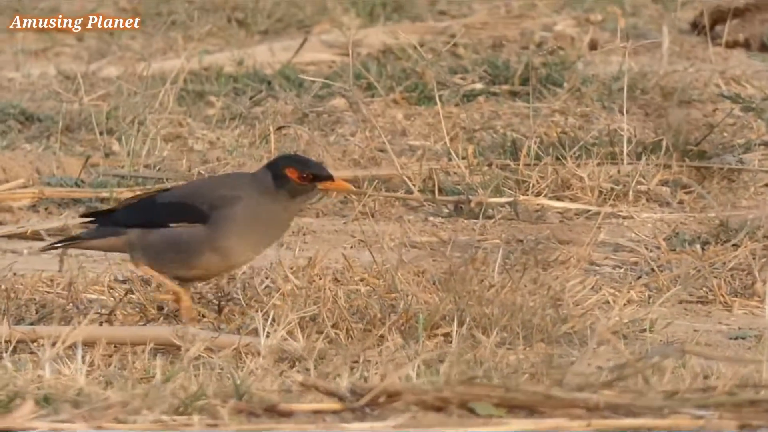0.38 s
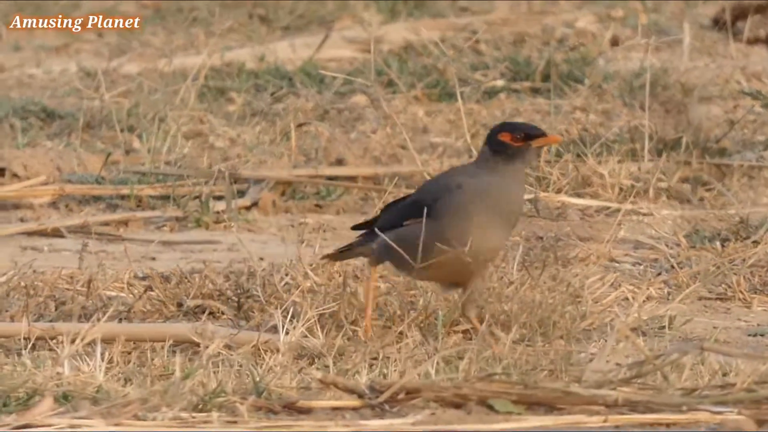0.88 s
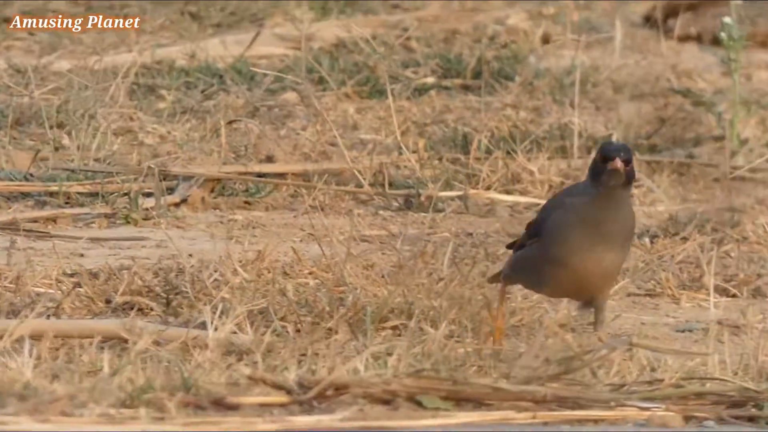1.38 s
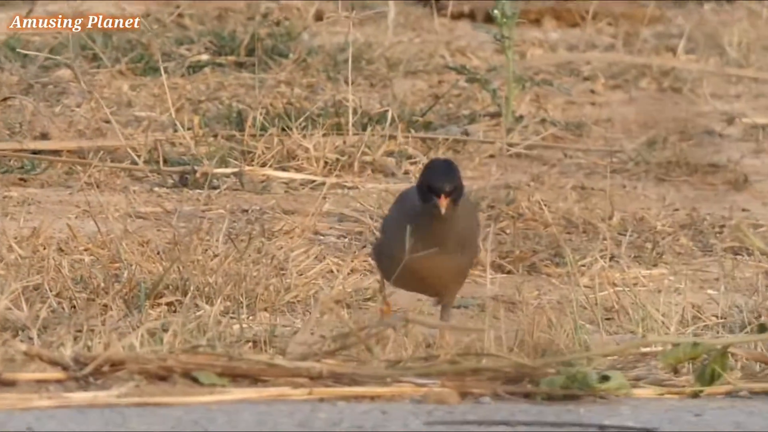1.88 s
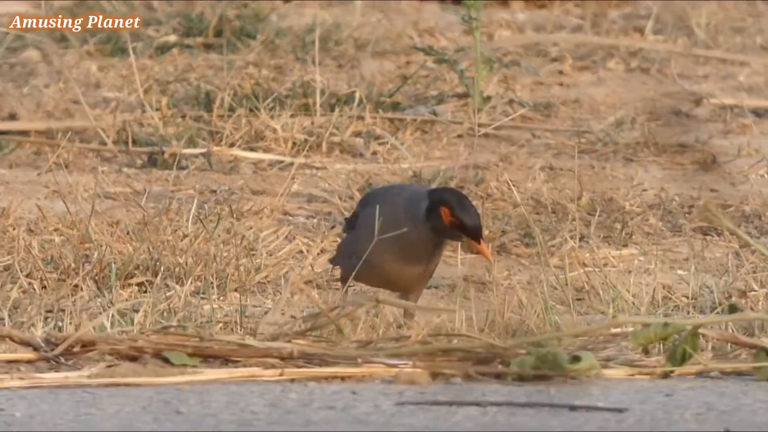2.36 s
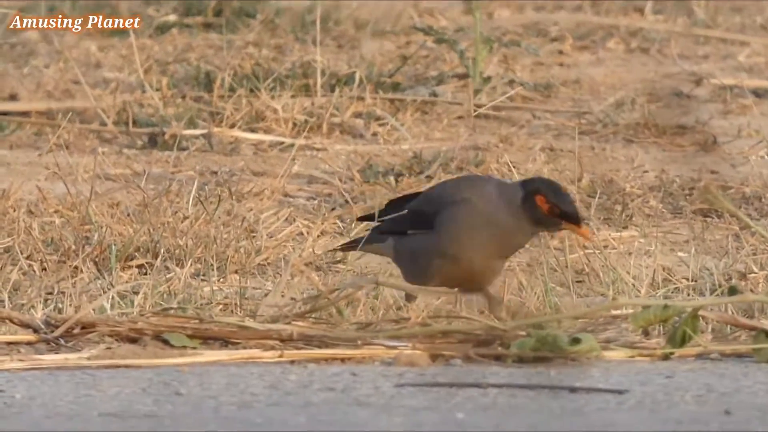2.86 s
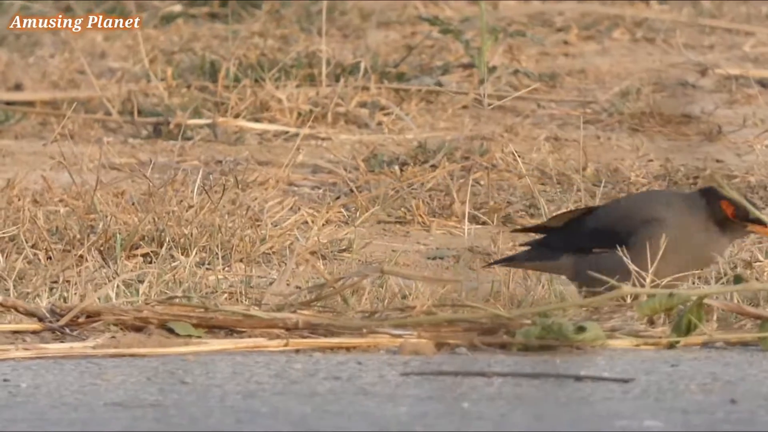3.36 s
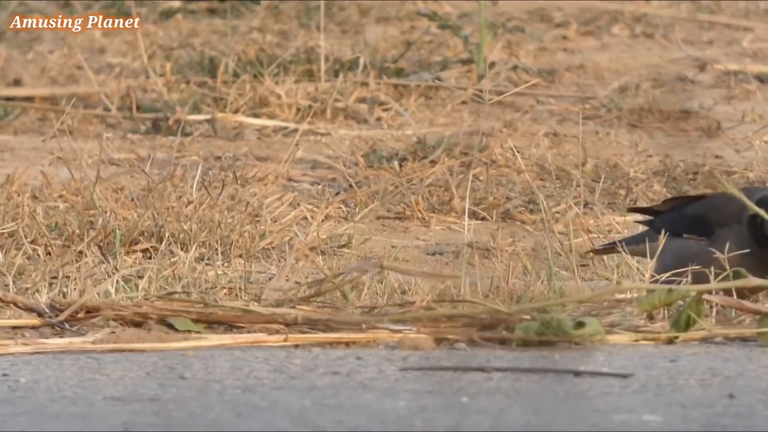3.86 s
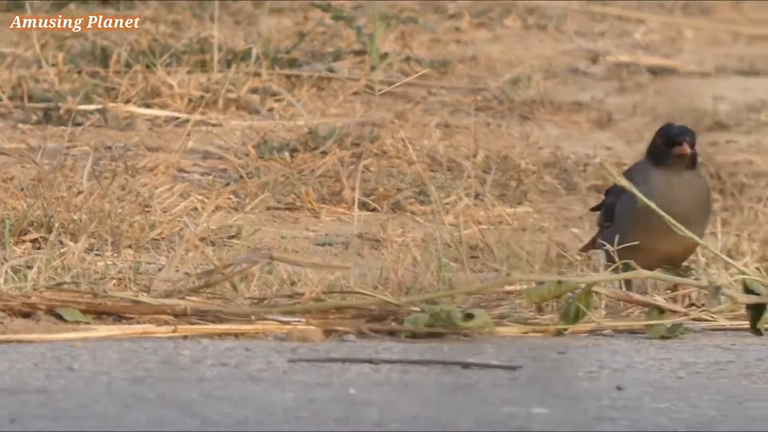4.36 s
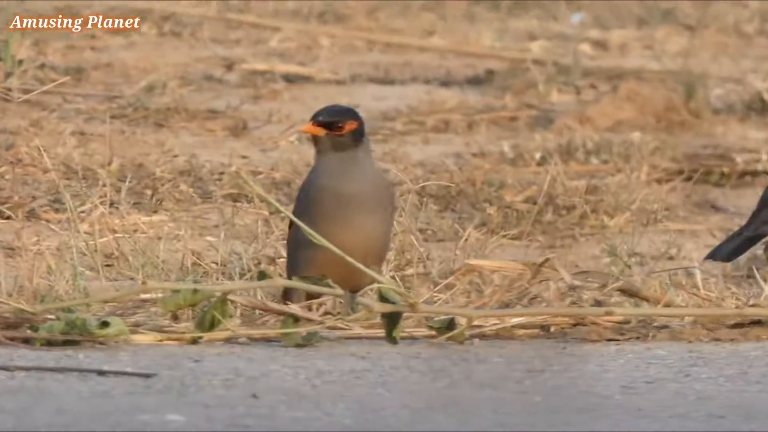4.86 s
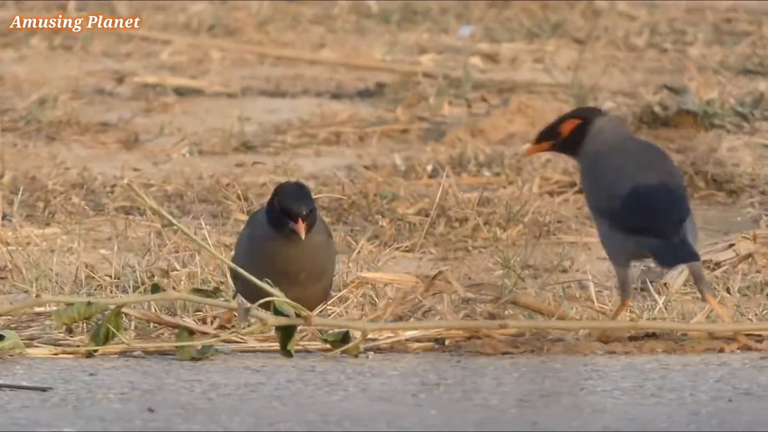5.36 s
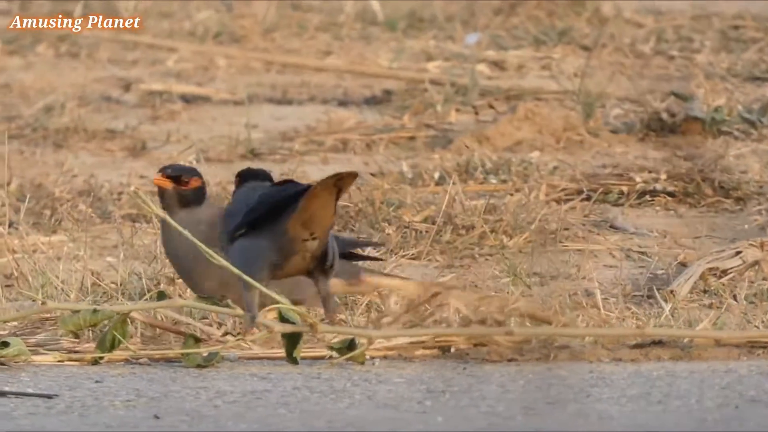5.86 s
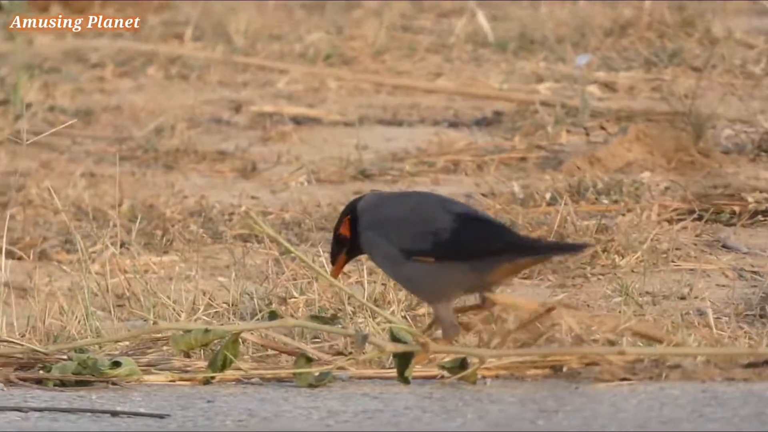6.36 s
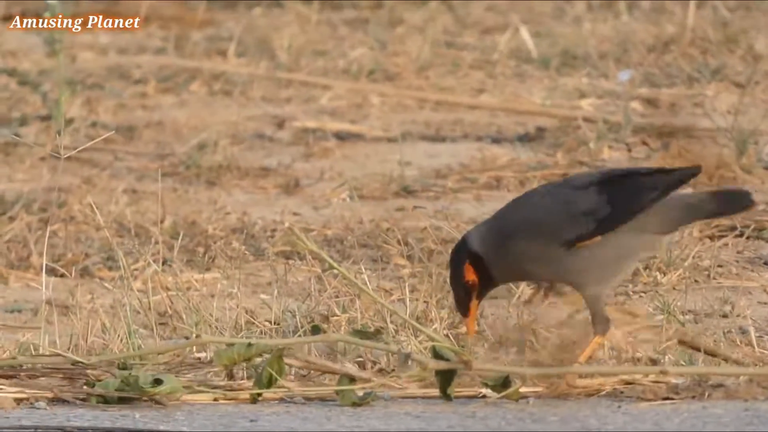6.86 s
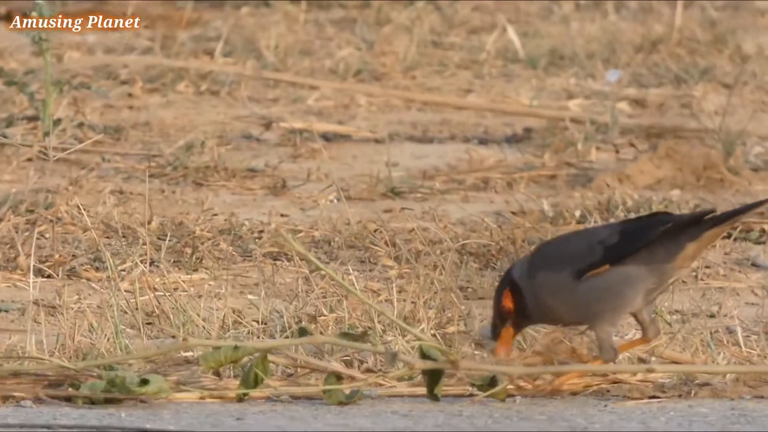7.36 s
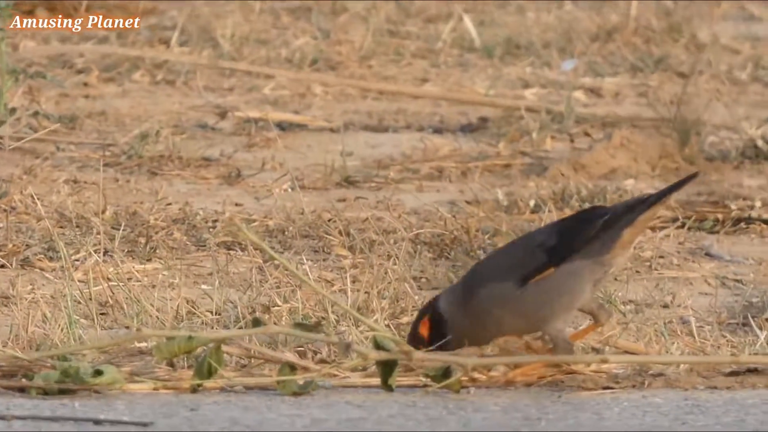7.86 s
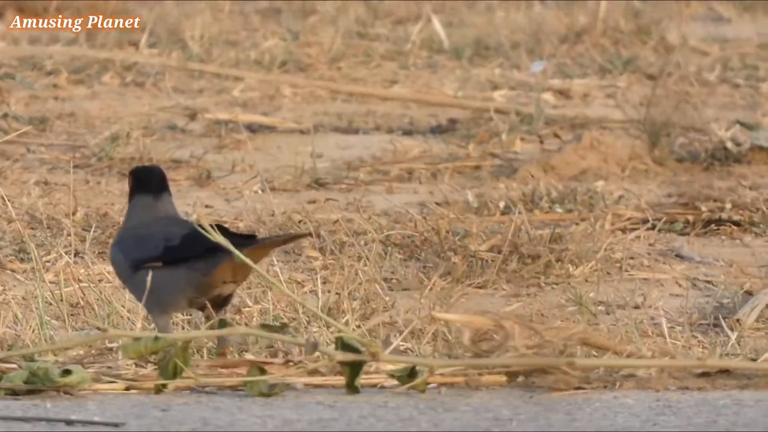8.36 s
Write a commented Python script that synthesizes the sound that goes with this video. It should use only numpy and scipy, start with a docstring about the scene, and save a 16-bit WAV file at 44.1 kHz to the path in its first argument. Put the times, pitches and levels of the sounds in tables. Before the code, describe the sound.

Stereo outdoor ambience in dry grass beside a road. Throughout, a steady, thin insect drone sits around 5 kHz over soft low traffic rumble and a faint engine hum. At 0-0.6 s come the end of a chipping phrase, a whistle and a sharp pip, with faint crickets. At 0.6-1.0 s a fast scratchy twitter swoops and flicks near the centre, then a faint distant bird answers. A rough descending buzz comes at 1.9-2.1 s. At 2.5-3.3 s a thin high seep and a row of chips on the left join a clear whistle, a loud pip and a soft slur. Crickets pulse strongly at 3.4-4.9 s. Falling whistles sound at 5.1-5.5 s, then a doubled beating one at 5.9 s. The twitter returns at 5.0-5.4 s, the buzz at 6.3 s, seep and chips from 7.7 s, with whistle and pip near 8.1 s. Crickets swell until the end at 8.7 s.

```python
"""In dry grass beside a road several birds sing: a twitter and a buzz, a row of chips with a whistle and
a pip, a high seep, falling calls. The twitter, chip and seep phrases return exactly; the calls come once.
Two-sided syrinx tones and near sines make the birds, pulsed falling tones the crickets' trills. Shaped noise
makes the insect drone, the distant traffic and the air; narrow resonances make the hum of far engines."""
import sys
import numpy as np
from scipy import signal
from scipy.fft import rfft, irfft
from scipy.io import wavfile
from scipy.ndimage import uniform_filter1d

SR = 44100
rng = np.random.default_rng(int(sys.argv[2]) if len(sys.argv) > 2 else 0)


def how_loud(loudness_db):
    """Turn decibels into a plain amplitude multiplier (0 dB gives 1, 20 dB gives 10)."""
    steps = np.asarray(loudness_db, float) / 20
    return 10 ** steps


def generate_wav(sig):
    """Save sig (samples, or channels by samples) to the path in sys.argv[1] as 16-bit PCM at SR."""
    pcm = np.round(np.clip(np.atleast_2d(sig).T, -1, 1) * 32767).astype(np.int16)
    wavfile.write(sys.argv[1], SR, pcm)


N = 384993


def read(points, hz):
    """Spectral envelope: dB or likeness interpolated straight on a log-frequency axis."""
    f, value = np.transpose(points)
    return np.interp(np.log(hz + 1), np.log(f + 1), value)


def evened(x):
    """Power normalisation: scales to rms 1."""
    return x / np.sqrt(np.mean(x ** 2) + 1e-20)


def wander(length, size):
    """Low-passed random fluctuation: noise averaged twice over size samples, rms 1."""
    smooth = uniform_filter1d(rng.standard_normal(length), size)
    return evened(uniform_filter1d(smooth, size))


def turns(hz):
    """Phase in radians is the running integral of frequency."""
    return 2 * np.pi * np.cumsum(hz) / SR


def span(length):
    """Time sampling of a note's shape in 160 points, a millisecond or less apart."""
    return np.linspace(0, length, num=160)


def table(start, t, *values):
    """Contour sampling: rows (s, values) from shapes over the time t since the start."""
    return np.column_stack(np.broadcast_arrays(start + t, *values))


def columns(rows):
    """Interpolates contours to the sample rate; the last, in dB, becomes a gain with soft ends."""
    s, *values = np.transpose(rows)
    t = np.arange(s[0], s[-1], 1 / SR)
    to_edge = np.minimum(t - s[0], s[-1] - t)
    fade = np.sin(np.pi / 2 * np.clip(to_edge / .004, 0, 1)) ** 2  # over 4 ms
    values[-1] = how_loud(values[-1])
    *pitches, gain = (uniform_filter1d(np.interp(t, s, v), size=61) for v in values)
    return *pitches, gain * fade


def add(mix, s, sound, pan_db):
    """Level-difference panning (left minus right); the mean of left and right keeps its level."""
    left = 1 / (1 + how_loud(-pan_db))
    part = mix[:, round(s * SR):][:, :len(sound)]
    part += 2 * np.outer([left, 1 - left], sound[:part.shape[1]])


def sing(voice, notes, pan_db):
    """Source and contour: a voice sounds each note's rows, giving (s, sound, pan dB)."""
    return [(rows[0][0], voice(rows), pan_db) for rows in notes]


def phrase(notes, again):
    """Superposition: lays (s, sound, pan dB) notes once, then copies that phrase exactly to each shift."""
    once, out = np.zeros((2, N)), np.zeros((2, N))
    for s, sound, pan_db in notes:
        add(once, s, sound, pan_db)
    for later in again:
        shift = round(later * SR)
        out[:, max(shift, 0):N + min(shift, 0)] += once[:, max(-shift, 0):N - max(shift, 0)]
    return out


def noise(spectrum, size, patchy_db, swell_db):
    """Filtered noise: random short-time spectra with drifting patches, a shared flicker and stereo coherence."""
    # left-right likeness: f/Hz, coherence
    likeness = [(60, 0.92), (120, 0.94), (240, 0.87), (480, 0.38), (950, 0.35), (1890, 0.77), (3770, 0.91),
                (7520, 0.6), (15000, 0.18)]
    # stereo balance: f/Hz, left minus right level/dB
    balance = [(60, -0.5), (150, 1), (380, 0.5), (950, 2.5), (2380, 3), (5980, 0), (15000, -1)]
    frames, hz = 4 * N // size + 5, np.fft.rfftfreq(size, 1 / SR)
    a, b, c, d, patches = rng.standard_normal((frames, len(hz), 5)).T
    patches = evened(uniform_filter1d(uniform_filter1d(patches, 8, axis=0), 8, axis=1))
    same = np.clip(read(likeness, hz), -1, 1)[:, None]
    left, other = a + 1j * b, c + 1j * d
    z = np.array([left, same * left + np.sqrt(1 - same ** 2) * other])
    z *= how_loud(read(spectrum, hz)[:, None] + patchy_db * patches + swell_db * wander(frames, size=3))
    z *= how_loud(np.outer([.5, -.5], read(balance, hz)))[:, :, None]
    return evened(signal.istft(z, nperseg=size, noverlap=3 * size // 4)[1][:, :N])


def insect_drone():
    """Many incoherent insects sum to noise with the spectrum of their massed songs."""
    # spectral shape of the massed insects: f/Hz, relative level/dB
    massed = [(2350, -33.5), (4000, -26), (4350, -27), (4610, -4), (5020, 1), (5460, 0.5), (5650, -2),
              (6220, -9.5), (7290, -12.5), (8540, -19.5), (9240, -13), (10200, -13.5), (11900, -20),
              (14500, -25), (15500, -28)]
    # slow course of the drone: t/s, rms level/dB
    course = [(0, -59), (1.2, -58), (2.5, -60), (3.7, -61), (5.0, -57.5), (5.6, -58.5), (6.801, -59.5),
              (8.73, -60)]
    gain = how_loud(np.interp(np.arange(N) / SR, *np.transpose(course)))
    return gain * noise(massed, size=256, patchy_db=1.0, swell_db=0.07)


def traffic_and_air():
    """Broadband noise weighted to low frequencies, at rms -60.5 dB."""
    # spectral shape of distant traffic and air: f/Hz, relative level/dB
    rumble = [(15, -50), (25, -13.5), (64, -5.5), (130, 1.5), (301, -9.5), (349, -7.5), (433, -10.5),
              (584, -7.5), (806, -13), (977, -10.5), (1260, -14), (1410, -15.5), (2790, -28.5),
              (3540, -51.5), (4200, -46), (5460, -57), (9240, -120)]
    return how_loud(-60.5) * noise(rumble, size=2048, patchy_db=1.67, swell_db=0.85)


def hum():
    """Resonance: noise in narrow bands gives the low wavering tones of far engines."""
    # resonances: f/Hz, width at half amplitude/Hz, rms level/dB
    engines = [(57, 9.9, -75), (119.5, 51, -73.5)]
    hz = np.fft.rfftfreq(N, 1 / SR)
    out = 0
    for f, width, db in engines:
        resonance = 1 / (1 + (2 * (hz - f) / width) ** 2)
        out = out + how_loud(db) * evened(irfft(rfft(rng.standard_normal(N)) * resonance, N))
    return out


def trill(start, end, swell, db, last_db):
    """Amplitude envelope: a swell that starts slowly, a slow drift of level, a faint tail."""
    swell_db, tail_db, tail_s = -15, -9, .12
    return [(start, db + swell_db), (start + .7 * swell, db + .7 * swell_db), (start + swell, db),
            (end, last_db), (end + .02, last_db + tail_db), (end + tail_s, last_db + tail_db)]


def crickets():
    """Stridulation: each wing stroke is a short tone that falls in pitch as the file slows."""
    # strokes: t/s of one mid stroke, strokes per s, f/Hz, fall per stroke period/Hz, pan/dB left minus right
    strokes = [(.0211, 42.9, 7120, 200, 4), (1.2525, 47.45, 6650, 250, 0), (2.6171, 41.35, 6750, 250, 0),
               (3.6131, 46.7, 6830, 420, 0), (4.3201, 45.7, 6830, 680, 0), (6.7132, 41.6, 6750, 250, 0),
               (7.323, 43.05, 7120, 200, 4), (8.2176, 46.85, 6780, 700, 0)]
    # envelopes: start t/s, end t/s, swell/s, level/dB after the swell, last level/dB
    envelopes = [(0, .43, .01, -73, -72.5), (1.2, 1.93, .1, -68, -67), (2.6, 3.35, .01, -75, -75),
                 (3.42, 4.31, .21, -62, -60.5), (4.31, 4.875, .01, -59.5, -59), (6.65, 7.7, .01, -71, -80),
                 (7.1, 8.15, .4, -72, -72), (8.1, 8.73, .15, -60.5, -58.5)]
    out = np.zeros((2, N))
    for (first, rate, hz, fall_hz, pan_db), row in zip(strokes, envelopes):
        rows = trill(*row)
        start = rows[0][0]
        gain, = columns(rows)
        t = start + np.arange(len(gain)) / SR
        place = ((t - first) * rate + .5) % 1 - .5  # in stroke periods, 0 at mid stroke
        stroke = np.exp(-(place / .21) ** 2) * how_loud(1.6 * wander(len(gain), size=300))
        pitch = hz - fall_hz * place + 30 * wander(len(gain), size=200)
        add(out, start, gain * evened(stroke * np.sin(turns(pitch))), pan_db)
    return out


def whistle(rows):
    """Pure-tone source: a near sine; the highest notes are second harmonics and carry a faint third."""
    hz, gain = columns(rows)
    third = how_loud(-24) * (hz.mean() > 8200) * np.sin(3 * turns(hz) / 2)
    return gain * np.sqrt(2) * (np.sin(turns(hz)) + third)


def chip(s, db, hz, dip_db):
    """Frequency modulation: the pitch arches under a round-shouldered level with a dip in the middle."""
    length_s, arch_hz, edge_db, dip_s = .027, 170, -18, .004
    t = span(length_s) - length_s / 2
    u = 2 * t / length_s
    return table(s, t, hz - arch_hz * u ** 2, db + edge_db * u ** 4 + dip_db * np.exp(-(t / dip_s) ** 2))


def long_whistle(start, end, db, hz):
    """Steady tone with an exponential swell, then a falling break."""
    swell_s, drop_hz_per_s, fade_db_per_s, tail_s = .03, 28000, 900, .013
    t = span(end - start + tail_s)
    after = np.maximum(t - (end - start), 0)
    return table(start, t, hz - drop_hz_per_s * after, db - 30 * np.exp(-t / swell_s) - fade_db_per_s * after)


def peep(start, length, db, from_hz, to_hz):
    """Bell envelope: a soft note swells and fades by 20 dB while the pitch eases to its goal."""
    t = span(length)
    pitch = from_hz + (to_hz - from_hz) * np.sin(np.pi / 2 * t / length)
    return table(start, t, pitch, db - 20 * (2 * t / length - 1) ** 2)


def pip(db, hz):
    """Tone burst: a few cycles under a bell, a faint lead-in, fainter repeats with turned sign."""
    width_s, gap_s = .0026, .0058
    t = np.arange(0, .05, 1 / SR) - .015  # the main bell peaks at 0
    levels_db = [-18, 0] + [-9 - 10 * np.sqrt(k) for k in range(4)]  # lead-in, main, repeats
    bells = 0
    for k, level in enumerate(levels_db):
        bells = bells + (-1) ** k * how_loud(level) * np.exp(-((t - (k - 1) * gap_s) / width_s) ** 2)
    return how_loud(db) * bells * np.sin(2 * np.pi * hz * t)


def chipping_bird():
    """Tonal whistling: chips, slide and closing slur hard left, long whistle and pip nearer the middle."""
    # chips: middle t/s, level/dB, top f/Hz, dip in the middle/dB
    chips = [(2.553, -52, 2790, -6), (2.639, -45.5, 2760, -6), (2.726, -44, 2740, -1.5),
             (2.812, -43, 2690, 0), (2.901, -44, 2640, 0), (2.988, -45.5, 2590, 0)]
    # soft slide among the chips: start t/s, length/s, level/dB, from f/Hz, to f/Hz
    slides = [(2.936, .03, -50, 2680, 2400)]
    # soft closing slur: t/s, f/Hz, level/dB
    slur = [(3.16, 2290, -70), (3.18, 2250, -64), (3.202, 2150, -57), (3.222, 2210, -62),
            (3.236, 2340, -69), (3.258, 2402, -58), (3.274, 2420, -56), (3.306, 2485, -66),
            (3.326, 2455, -63), (3.338, 2420, -72)]
    # long whistle: start t/s, break t/s, level/dB, f/Hz
    long_note = (2.843, 2.929, -35.5, 3260)
    # pip: peak t/s, peak level/dB, f/Hz
    pip_note = (3.0805, -27.5, 2495)
    # phrase repeats: shift t/s
    chip_shifts = [-2.7115, 0, 5.1809]
    notes = sing(whistle, [chip(*r) for r in chips] + [peep(*r) for r in slides] + [slur], pan_db=36)
    notes += sing(whistle, [long_whistle(*long_note)], pan_db=6)
    notes += [(pip_note[0] - .015, pip(*pip_note[1:]), 3.5)]
    return phrase(notes, chip_shifts)


def syrinx(low_hz, high_hz, gain, low_step_db, high_step_db, breath_db, jitter_hz):
    """Two membranes gate one air stream: harmonics, sums and differences, coloured by the tract, plus breath."""
    # windpipe and beak of the twittering bird: f/Hz, relative level/dB
    tract = [(2500, -35), (3400, -25.5), (4000, -14.5), (4800, -1), (6500, 4), (7600, -6.5), (8600, -26.5),
             (10500, -17), (12000, -31), (13500, -44)]
    low_hz = low_hz + jitter_hz * wander(len(gain), size=20)
    high_hz = high_hz + jitter_hz * wander(len(gain), size=20)
    sound, power = 0, 1e-12
    for i in range(-2, 5):
        for j in range(-2, 4):
            hz = i * low_hz + j * high_hz
            line_db = low_step_db * abs(i) + high_step_db * abs(j) + read(tract, np.maximum(hz, 1))
            line = how_loud(line_db) * (hz > 1500)
            sound = sound + line * np.cos(turns(hz))
            power = power + line ** 2 / 2
    bins_hz = np.fft.rfftfreq(len(gain), 1 / SR)
    colour = how_loud(0.71 * read(tract, bins_hz)) * (bins_hz > 2800)  # breath takes a flatter tract
    breath = irfft(rfft(rng.standard_normal(len(gain))) * colour, len(gain))
    return gain * (sound / np.sqrt(power) + how_loud(breath_db) * evened(breath))


def duet(rows):
    """Intermodulation of both membranes: a stack of lines spaced by the difference of the pitches."""
    return syrinx(*columns(rows), low_step_db=-3.5, high_step_db=-4.5, breath_db=-12, jitter_hz=17)


def solo(rows):
    """Harmonic series of one membrane alone."""
    hz, gain = columns(rows)
    return syrinx(hz, hz, gain, low_step_db=-2.5, high_step_db=-90, breath_db=-12, jitter_hz=25)


def warble(start, length, db, hz):
    """Frequency modulation: the pitch swings about a sinking centre, loudest near the middle."""
    sink_hz_per_s, swing_hz, period_s, top_s, loud_s = 15400, 390, .035, .0075, .031
    t = span(length)
    pitch = hz - sink_hz_per_s * t + swing_hz * np.cos(2 * np.pi * (t - top_s) / period_s)
    slope_db_per_s = np.where(t < loud_s, 380, 266)
    return table(start, t, pitch, db - slope_db_per_s * abs(t - loud_s))


def glide(start, length, db, from_hz, to_hz):
    """Linear frequency sweep that sags 3 dB in level."""
    return [(start, from_hz, db), (start + length, to_hz, db - 3)]


def blurred_duet(rows):
    """Line broadening: more jitter and breath blur the lines, for the far duets and the near scratch."""
    return syrinx(*columns(rows), low_step_db=-3, high_step_db=-3.5, breath_db=-6, jitter_hz=55)


def flick(s, db, hz):
    """Fast frequency sweep: a steep V of pitch, loudest at its foot."""
    down_s, up_s, hz_per_s = .006, .005, 80000
    return [(s - down_s, hz + hz_per_s * down_s, db - 4), (s, hz, db), (s + up_s, hz + hz_per_s * up_s, db - 4)]


def tick(db, hz):
    """Chirp under a Gaussian bell: a short, steep and slightly rough fall that peaks at 7 ms."""
    t = np.arange(0, .014, 1 / SR)
    pitch = hz - 120000 * (t - .003) + 250 * wander(len(t), size=12)
    return how_loud(db) * np.exp(-((t - .007) / .0028) ** 2) * np.sin(turns(pitch))


def buzz_line(start, length, db, top_hz, end_hz):
    """Exponential relaxation: the centre pitch scoops up, then sags in small steps; the effort rises and ends."""
    scoop_hz, scoop_s, sag_s, step_hz, step_s, rise_s = 3400, .007, .056, 100, .0285, .005
    t = span(length)
    pitch = end_hz + (top_hz - end_hz) * np.exp(-t / sag_s)
    pitch = pitch - scoop_hz * np.exp(-t / scoop_s)
    pitch = pitch + step_hz * np.cos(2 * np.pi * (length - t) / step_s)
    return table(start, t, pitch, db - 24 * np.exp(-t / rise_s) - 8 * np.exp((t - length) / rise_s))


def buzz(line):
    """Frequency modulation about 175 times a second; the rough low side shows only in sum and difference."""
    hz, gain = columns(buzz_line(*line))
    shake = turns(175 + 25 * wander(len(hz), size=150))
    flutter = how_loud(4.3 * np.cos(2 * shake) + 1.7 * wander(len(hz), size=40))  # dips at both ends of each swing
    high = turns(hz + 230 * np.sin(shake) + 40 * wander(len(hz), size=20))
    low = turns(4050 + 150 * wander(len(hz), size=20))
    lines = np.cos(high) + how_loud(-27.5) * np.cos(high + low)
    lines += how_loud(-35) * np.cos(high - low) + how_loud(-40) * np.cos(2 * high)
    return np.sqrt(2) * gain * flutter * lines


def twitterer():
    """Two-voice syrinx song: twitter, duets, buzz and ticks, with a far bird's duets."""
    # near bird, both sides of the syrinx: t/s, low side f/Hz, high side f/Hz, level/dB
    near_duets = [
        [(0.637, 3380, 4720, -52), (0.652, 3320, 4715, -45), (0.666, 3250, 4650, -44), (0.675, 3800, 4950, -48),
         (0.69, 3500, 4800, -54)],
        [(0.9, 3150, 3910, -56), (0.915, 3370, 4420, -45.5), (0.95, 3860, 5220, -38), (0.968, 3900, 5364, -38),
         (0.973, 3910, 5290, -45)],
    ]
    # far bird, both sides of the syrinx: t/s, low side f/Hz, high side f/Hz, level/dB
    far_duets = [
        [(1.15, 3380, 4390, -89), (1.2, 3900, 5300, -63.5), (1.24, 4320, 5210, -56)],
        [(2.225, 3590, 4500, -69), (2.26, 3900, 5100, -60), (2.28, 4480, 5560, -59), (2.305, 4540, 5960, -55)],
    ]
    # sinking, swinging note: start t/s, length/s, level/dB, starting centre f/Hz
    warble_note = (.667, .063, -38.5, 3560)
    # swoop up, down and up again: t/s, f/Hz, level/dB
    swoop = [(.731, 2400, -43), (.736, 3550, -47), (.739, 4720, -42), (.744, 4820, -38), (.749, 4540, -46),
             (.752, 3410, -46), (.758, 2870, -52), (.762, 3160, -48), (.766, 3950, -48)]
    # straight notes: start t/s, length/s, starting level/dB, from f/Hz, to f/Hz
    glides = [(.766, .023, -41, 3310, 3250), (.804, .01, -47, 2460, 3300), (.865, .019, -35, 3245, 3225),
              (.968, .019, -41, 3940, 3790), (.983, .034, -40.5, 3680, 3450)]
    # breathy scratch under and around the quick dips: t/s, low f/Hz, high f/Hz, level/dB
    rasp = [(.788, 3400, 4700, -56), (.825, 3700, 4900, -57), (.864, 3300, 4500, -56)]
    # quick dips: lowest point t/s, level/dB, lowest f/Hz
    flicks = [(.832, -43, 2350), (.852, -43, 2450)]
    # faint ticks between phrases: peak t/s, peak level/dB, f/Hz 4 ms before the peak
    ticks = [(1.338, -61, 4800), (1.403, -55, 4880), (1.742, -66, 4600), (1.822, -60.5, 4600),
             (2.42, -67, 4570)]
    # buzz: start t/s, length/s, level/dB before the flutter, sag from f/Hz, sag to f/Hz
    buzz_note = (1.943, .152, -41, 8150, 5870)
    # phrase repeats: shift t/s
    twitter_shifts = [0, 4.3567]
    near_pan_db = 3.5
    solos = [warble(*warble_note), swoop] + [glide(*r) for r in glides] + [flick(*r) for r in flicks]
    notes = sing(solo, solos, near_pan_db) + sing(duet, near_duets, near_pan_db)
    notes += sing(blurred_duet, [rasp], near_pan_db) + sing(blurred_duet, far_duets, pan_db=.4)
    notes += [(buzz_note[0], buzz(buzz_note), -3)]
    notes += [(s - .007, tick(db, hz), 0) for s, db, hz in ticks]
    return phrase(notes, twitter_shifts)


def seeping_bird():
    """Tonal whistling: a high seep near the middle, with a soft peep hard left."""
    # high seep: t/s, f/Hz, level/dB
    seep = [(2.535, 8200, -68), (2.555, 8320, -45), (2.572, 8580, -49), (2.592, 8100, -51)]
    # its soft companion: start t/s, length/s, level/dB, from f/Hz, to f/Hz
    companion = (2.585, .021, -48, 3740, 3700)
    # phrase repeats: shift t/s
    seep_shifts = [0, 5.1309]
    notes = sing(whistle, [seep], pan_db=.4) + sing(whistle, [peep(*companion)], pan_db=36)
    return phrase(notes, seep_shifts)


def fall(start, length, db, hz):
    """Exponential relaxation: the pitch holds, then settles; quick rise, rounded top, quick stop."""
    to_hz, hold_s, settle_s, rise_s, stop_s = 2360, .007, .018, .008, .006
    t = span(length)
    edges = np.exp(-(t / rise_s) ** 2) + np.exp(-((t - length) / stop_s) ** 2)
    pitch = to_hz + (hz - to_hz) * np.exp(-np.maximum(t - hold_s, 0) / settle_s)
    return table(start, t, pitch, db - 22 * edges - 7 * (1.8 * t / length - 1) ** 2)


def thin(start, db, hz):
    """Frequency sweep: level pitch at first, then the note tips over and drops."""
    length_s, tip_s, drop_hz = .04, .012, 1600
    t = span(length_s)
    pitch = hz - drop_hz * np.clip((t - tip_s) / (length_s - tip_s), 0, 1) ** 1.4
    return table(start, t, pitch, db - 12 * (t / length_s * 1.6 - 1) ** 2)


def pair(length, db):
    """Beating: a second voice joins a falling call, closes in on its pitch and beats ever slower."""
    from_hz, to_hz, settle_s, top_s, wide_s = 2750, 2290, .04, .041, .017
    join_s, join_stop_s, join_share, beats, beat_s = .021, .058, .85, 2.28, .0095
    t = np.arange(0, length, 1 / SR)
    first = turns(to_hz + (from_hz - to_hz) * np.exp(-t / settle_s))
    ahead = 2 * np.pi * beats * np.log(1 + np.maximum(t - join_s, -beat_s / 2) / beat_s)
    enter = np.clip((t - join_s) / beat_s + .6, 0, 1)
    leave = np.clip((join_stop_s - t) / .02, 0, 1) ** .5
    second = join_share * enter * leave * np.sin(first + ahead)
    bell = np.exp(-((t - top_s) / wide_s) ** 2 / 2)
    gain = how_loud(db) * bell * np.clip(np.minimum(t, length - t) / .006, 0, 1)
    return np.sqrt(2) * gain * (np.sin(first) - second)


def falling_calls():
    """Tonal whistling: falling calls, the last one doubled, with soft peeps and thin high notes."""
    # calls settling on one pitch: start t/s, length/s, level/dB before shaping, from f/Hz, pan/dB
    falls = [(5.118, .058, -36.5, 2670, 9.5), (5.357, .055, -40, 2620, 12.4), (5.484, .06, -36.5, 3080, 16)]
    # soft peeps near the calls: start t/s, length/s, level/dB, from f/Hz, to f/Hz
    peeps = [(5.402, .018, -57, 4030, 4060), (5.462, .03, -50, 3830, 3800), (5.495, .04, -63, 3840, 3830),
             (5.812, .035, -66, 4090, 4020), (5.84, .02, -53, 4040, 3900), (5.852, .036, -56, 3780, 3790)]
    # thin high notes: start t/s, level/dB, top f/Hz
    thins = [(5.576, -62, 8250), (8.298, -54, 8000)]
    # last, two-voiced call: start t/s, length/s, first voice's top level/dB, pan/dB
    last_call = (5.859, .078, -35.3, 14.4)
    notes = [(r[0], whistle(fall(*r[:4])), r[4]) for r in falls]
    notes += sing(whistle, [peep(*r) for r in peeps], pan_db=3.7)
    notes += sing(whistle, [thin(*r) for r in thins], pan_db=.4)
    notes += [(last_call[0], pair(*last_call[1:3]), last_call[3])]
    return phrase(notes, [0])


def surroundings(x, t60):
    """Reverberation: dense echoes off ground, shrubs and walls decay by 60 dB in t60 seconds."""
    taps, at = np.zeros((2, SR // 3)), np.arange(150, SR // 3 - 20, 20)
    for channel in taps:
        signs = rng.choice([-1., 1.], len(at))
        channel[at + rng.integers(0, 20, len(at))] = signs * how_loud(-60 * at / SR / t60)
    return signal.oaconvolve(x, taps / np.linalg.norm(taps[0]), axes=1)[:, :N]


def scene():
    """Superposition: birds and crickets with their echoes over drone, air and hum."""
    trills, twitter = crickets(), twitterer()
    whistles = chipping_bird() + seeping_bird() + falling_calls()
    echoes = surroundings(how_loud(-12.5) * twitter + how_loud(-7.5) * trills, t60=.15)
    echoes += how_loud(-20.5) * surroundings(whistles, t60=.2)
    return twitter + whistles + trills + echoes + insect_drone() + traffic_and_air() + hum()


def low_pass(x):
    """Removes everything above the highest recorded frequency."""
    return signal.sosfilt(signal.butter(12, 15610, fs=SR, output="sos"), x)


def record(dry):
    """Linear filtering: the microphone's low cut at 42 Hz and a band limit at 15450 Hz."""
    low_cut = signal.butter(3, 42, "high", fs=SR, output="sos")
    cut = signal.sosfilt(low_cut, dry)
    limited = signal.oaconvolve(cut, signal.firwin(255, 15450, fs=SR)[None], "same")
    return low_pass(limited)


dry = scene()
out = record(dry)
generate_wav(out)
```